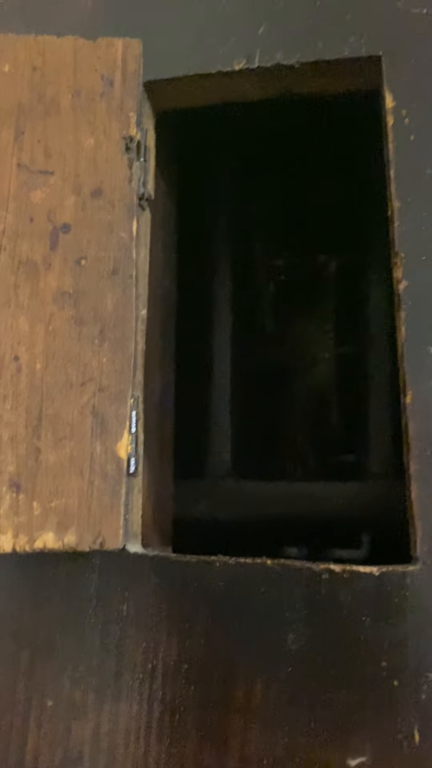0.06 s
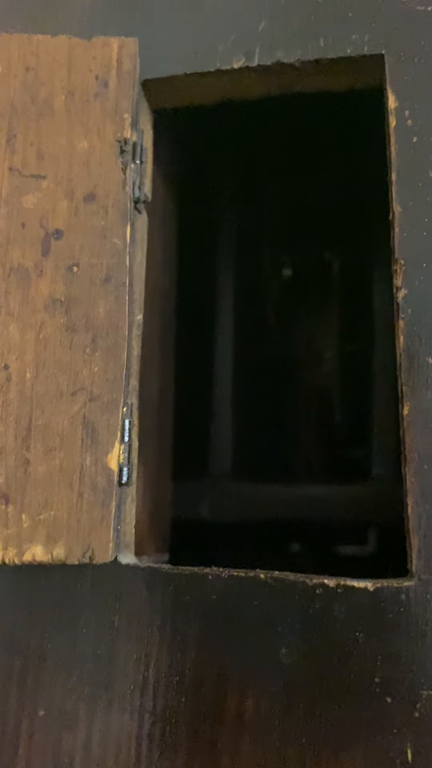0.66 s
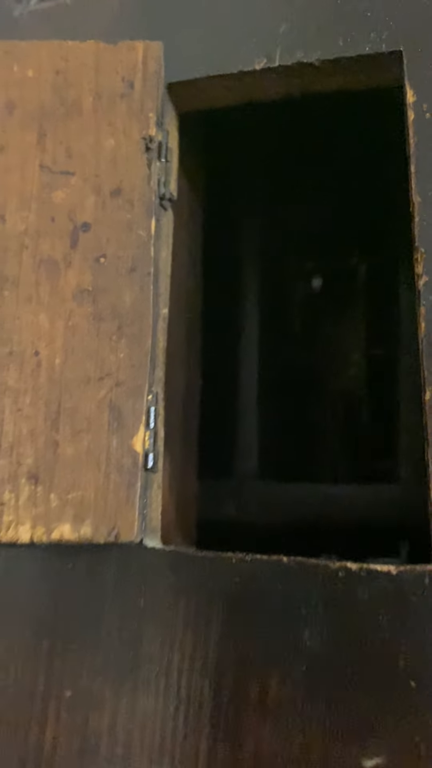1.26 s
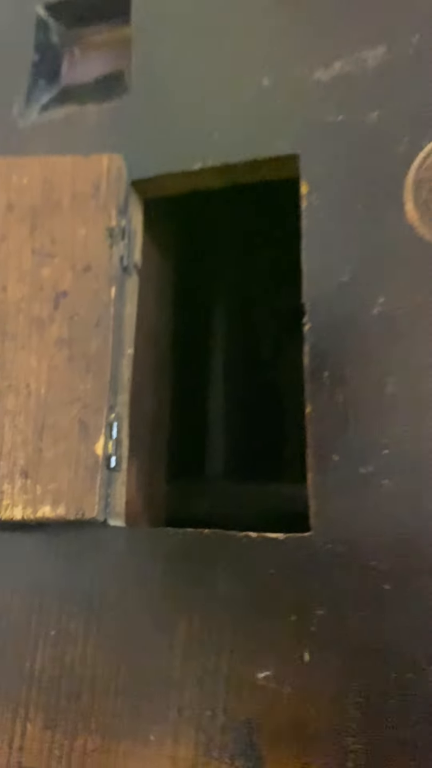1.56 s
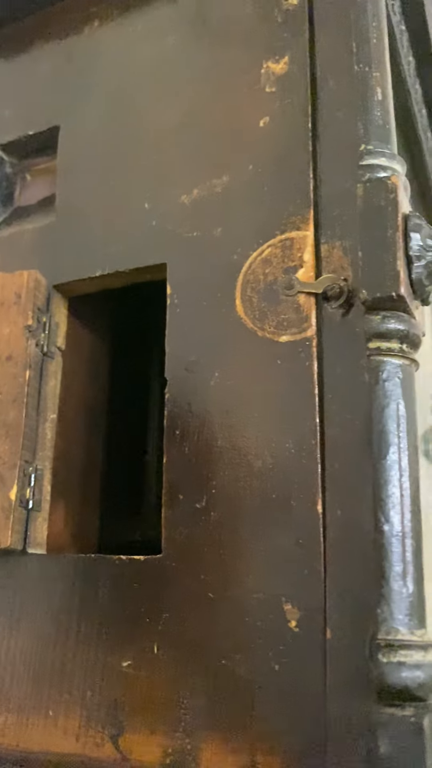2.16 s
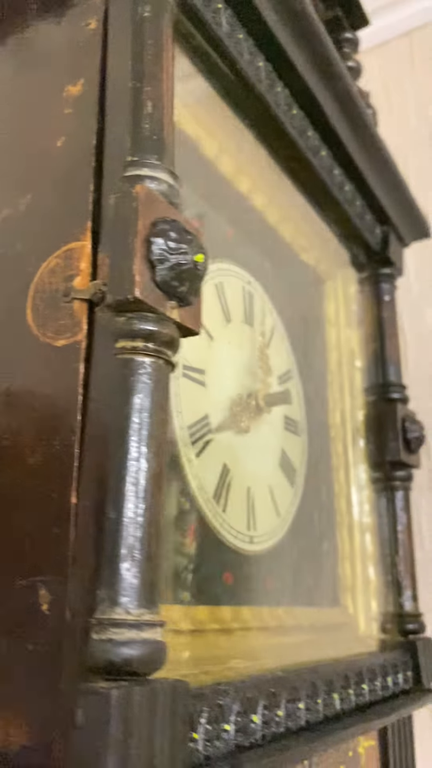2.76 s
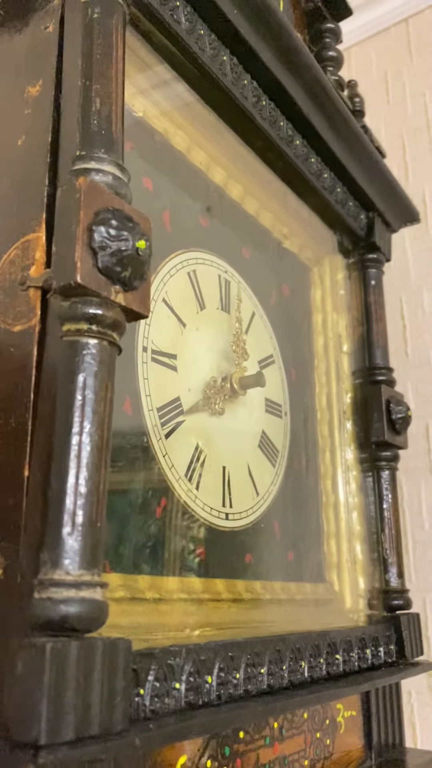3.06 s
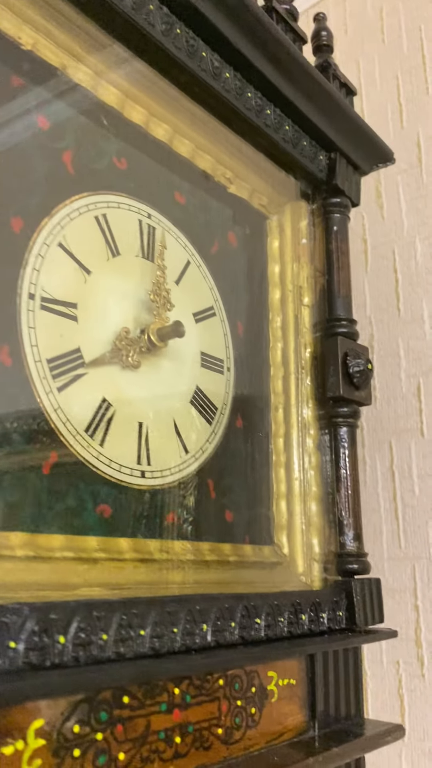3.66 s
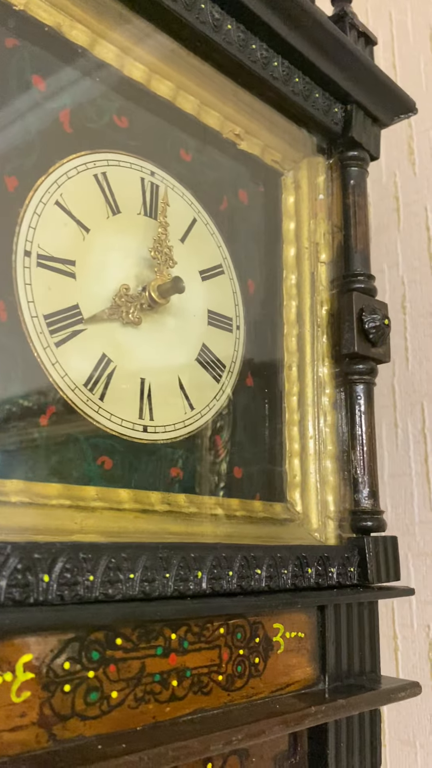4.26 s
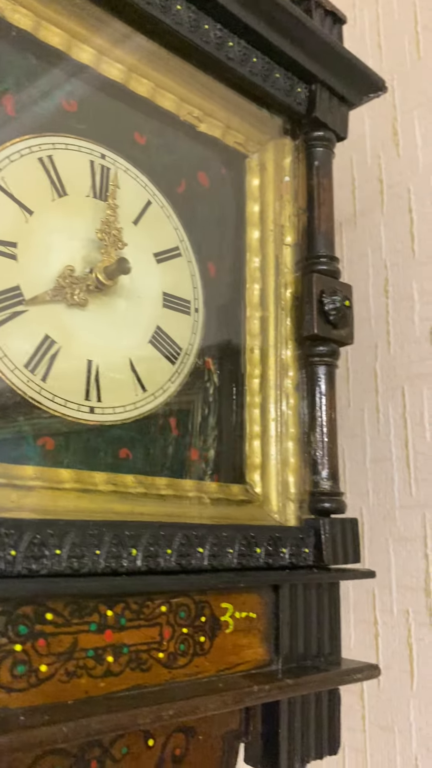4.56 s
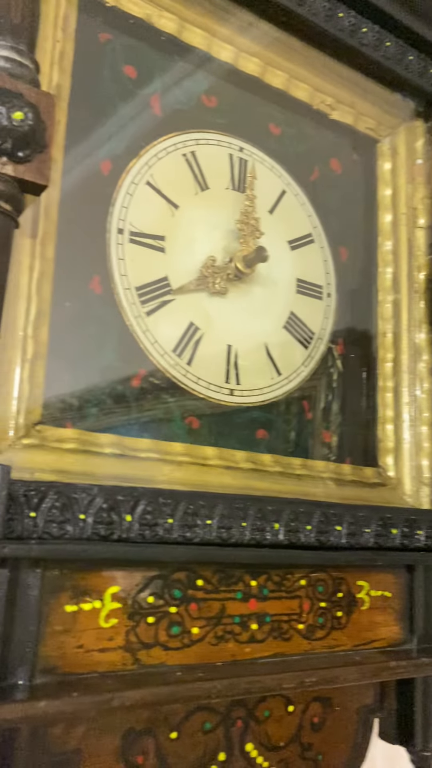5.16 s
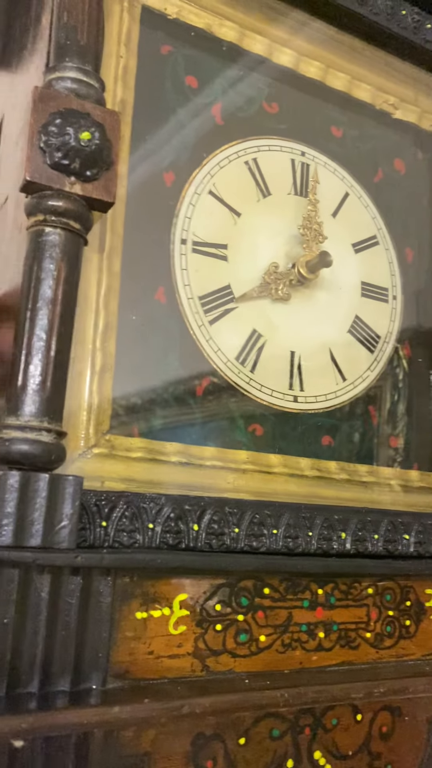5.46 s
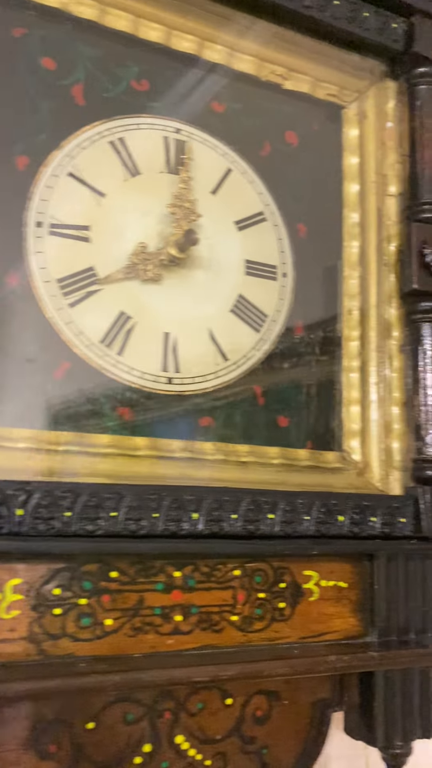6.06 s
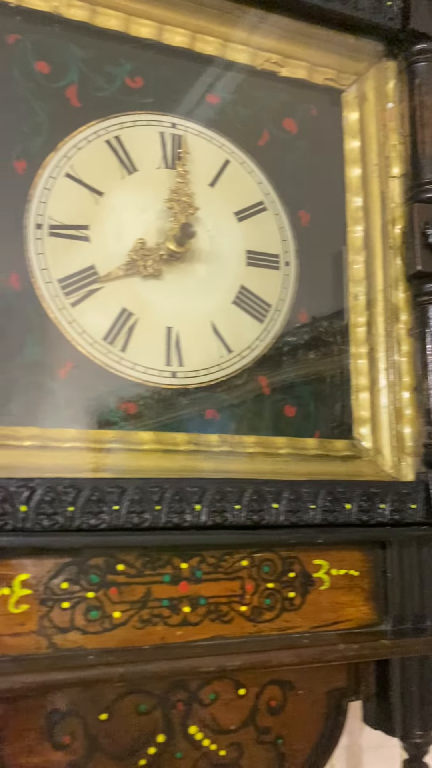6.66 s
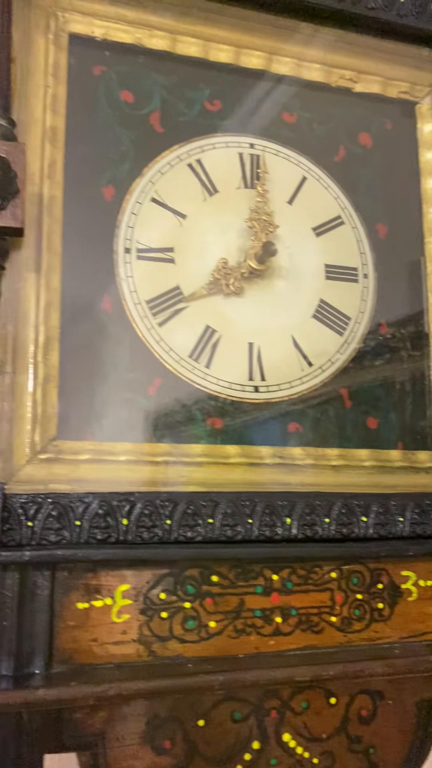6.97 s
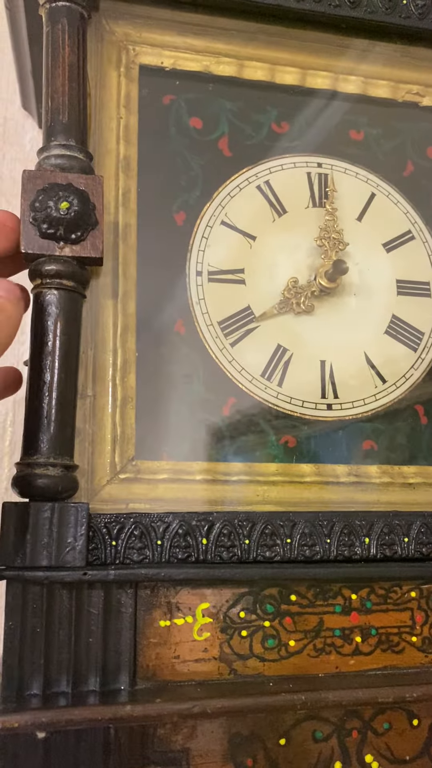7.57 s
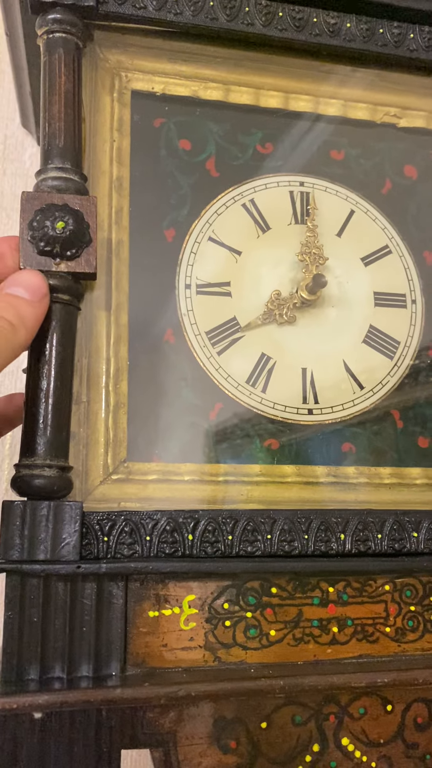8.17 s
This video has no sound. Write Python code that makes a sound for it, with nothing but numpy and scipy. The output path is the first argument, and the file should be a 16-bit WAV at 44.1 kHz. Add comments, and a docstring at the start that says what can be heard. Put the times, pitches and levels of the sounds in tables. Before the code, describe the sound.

An old wooden clock ticks close up while fingers knock and rub its case, with two other clocks ticking faintly further off.

```python
"""An old wooden cuckoo clock ticks unevenly, close up in a small room: its pallets crack on the escape
wheel, and the movement and case ring. The microphone, a hand-held phone with two ports, starts at the
open side door and moves round to the front. Fingers knock, bump and rub on the case, and brass parts
click and ring. Two more clocks tick faintly further off, over a low hum and handling rumble."""
import sys
import numpy as np
from scipy import signal
from scipy.fft import rfft, irfft, next_fast_len
from scipy.io import wavfile
from scipy.ndimage import uniform_filter1d

SR = 44100
rng = np.random.default_rng(int(sys.argv[2]) if len(sys.argv) > 2 else 0)


def unload_wav(signal):
    """Save mono or channel-first audio to the path in sys.argv[1] as 16-bit WAV at rate SR, clipped to [-1, 1]."""
    wavfile.write(
        sys.argv[1],
        SR,
        np.round(np.clip(np.atleast_2d(signal).T, -1, 1) * 32767).astype(np.int16),
    )


N = 366912
AGE = np.arange(SR // 2) / SR  # time since a blow [s]

# beats of the near clock, tick and tock in turn: (time [s], level [dB], treble [dB])
NEAR_BEATS = [(0.471, -32.5, 1), (1.002, -36.5, 8.5), (1.5881, -34.5, -1), (2.121, -34.5, 2),
              (2.702, -37.5, -6), (3.242, -42, 3.5), (3.8216, -35.5, -7.5), (4.362, -38, 2.5),
              (4.955, -42.5, -5), (5.5071, -42.5, 4.5), (6.073, -43, -4), (6.6238, -45.5, 6),
              (7.193, -44, -4), (7.735, -43.5, 3.5), (8.3022, -44, -2.5)]
# spectrum of handling rumble and thumps: (frequency [Hz], level [dB])
RUMBLE_COLOUR = [(25, -9.5), (40, -2), (60, 7), (90, 9), (150, 1), (250, -2.5), (400, -7.5), (800, -39.5)]
# spectrum of rubbing and room hiss: (frequency [Hz], level [dB])
RUSTLE_COLOUR = [(200, 2), (500, 4), (900, -0.5), (1500, -1.5), (2400, -2), (4500, -9), (7000, -17),
                 (12500, -20), (15800, -24.5)]


def undb(db):
    """Decibels to gain."""
    return 10 ** (np.asarray(db) / 20)


def at(table, hz, axis=1):
    """A column of a table read on a log-frequency axis."""
    table = np.array(table)
    return np.interp(np.log(np.maximum(hz, 1)), np.log(table[:, 0]), table[:, axis])


def gain_curve(rows):
    """Gain at every sample from (time [s], level [dB]) rows."""
    return undb(np.interp(np.arange(N) / SR, *np.transpose(rows)))


def coloured(x, points):
    """Filter by (frequency [Hz], gain [dB]) points; padding keeps the end from wrapping round."""
    size = next_fast_len(len(x) + 2048)
    gain = undb(at(points, np.fft.rfftfreq(size, 1 / SR)))
    return irfft(rfft(x, size) * gain, size)[:len(x)]


def unit(x):
    """Scale a blow to the energy of 10 ms at full level."""
    return x / np.sqrt(np.sum(x ** 2) * 100 / SR)


def add(track, s, sound):
    """Mix a sound in at time s."""
    start = int(np.clip(s * SR, 0, N - 1))
    track[start:start + len(sound)] += sound[:N - start]


def delayed(x, lag_s):
    """The same blow a little later."""
    return np.interp(AGE - lag_s, AGE, x, left=0)


def fade(rise, t60):
    """A rounded attack and an exponential decay."""
    return (1 - np.exp(-(AGE / rise) ** 2)) * np.exp(-np.log(1000) * AGE / t60)


def mode(hz, t60, rise=0.00029):
    """One damped vibration."""
    return unit(fade(rise, t60) * np.sin(2 * np.pi * (hz * AGE + rng.random())))


def chord(modes, t60, scatter_db):
    """Modes struck together, balanced anew at each blow; t60 holds at 1 kHz, higher ones die sooner."""
    return sum(undb(db + scatter_db * rng.standard_normal()) * mode(hz, t60 * (1000 / hz) ** .25, .0015)
               for hz, db in modes)


def swell(hz, swell_s):
    """A heavily damped wooden mode that builds up and dies within a few cycles."""
    return unit((AGE / swell_s) ** 4 * np.exp(-2 * AGE / swell_s) * np.sin(2 * np.pi * hz * AGE))


def burst(colour, decay):
    """Dense modes as quarter-octave noise bands; decay rows are (frequency [Hz], rise [s], t60 [s])."""
    edges_hz = 35 * 2 ** np.arange(0, 9.1, .25)
    noise = rfft(rng.standard_normal(len(AGE)))
    hz = np.fft.rfftfreq(len(AGE), 1 / SR)
    out = 0
    for lo, hi in zip(edges_hz, edges_hz[1:]):
        centre = np.sqrt(lo * hi)
        envelope = fade(at(decay, centre), at(decay, centre, axis=2))
        band = irfft(noise * (hz >= lo) * (hz < hi), len(AGE)) * envelope
        out = out + unit(band) * undb(at(colour, centre)) * np.sqrt(hi - lo)
    return unit(out)


def wash(colour, flicker_db, rate):
    """Coloured noise whose level wanders, with `rate` turns a second."""
    noise = coloured(rng.standard_normal(N), colour)
    hold = int(SR / rate)
    steps = np.repeat(rng.standard_normal(N // hold + 1), hold)[:N]
    noise = noise * undb(flicker_db * uniform_filter1d(steps, hold))
    return noise / noise.std()


def boxed(x, wall_db, count=4):
    """Reflections between the close walls of a case carve hollow peaks, different at each blow."""
    reflections = sum(delayed(x, lag / SR) for lag in rng.integers(30, 150, count))
    return unit(x + undb(wall_db) * reflections)


def room(x, colour):
    """The diffuse answer of the walls."""
    # reverberation of the small room: (frequency [Hz], rise [s], t60 [s])
    room_decay = [(100, 0.005, 0.43), (400, 0.0071, .36), (2000, 0.006, 0.36), (5900, 0.0035, 0.25),
                  (14000, 0.0095, 0.063)]
    response = burst(colour, room_decay)
    return signal.fftconvolve(x, response / np.sqrt(np.sum(response ** 2)))[:N]


def background(tone_hz=345, tone_db=-3.5, waver_hz=4, hiss_db=-79.5):
    """The hand rumbles on the phone, a low hum wavers, and the room hisses faintly."""
    # rumble of the grip, restless once the phone is at the front: (time [s], level [dB])
    grip_level = [(0, -66), (1.3, -71), (2.4, -63.5), (3.1, -65), (4.2, -60), (4.8, -58), (5.85, -58),
                  (6.5, -56.5), (6.9, -67.5), (7.3, -55.5), (7.65, -63.5), (8.32, -60)]
    # the hum, fading and returning as the phone moves: (time [s], level [dB])
    hum_level = [(0, -64), (1.1, -62.5), (1.4, -68.5), (2.8, -64.5), (3.4, -72), (4.3, -62), (5, -60.5),
                 (5.6, -71.5), (6.85, -75.5), (8.32, -65.5)]
    # noise around the hum's clear tone: (frequency [Hz], level [dB])
    hum_colour = [(150, -19.5), (240, -4), (290, -9.5), (345, 2.5), (400, -12), (480, -19.5), (700, -19),
                  (1200, -48)]
    rumble = gain_curve(grip_level) * wash(RUMBLE_COLOUR, flicker_db=4.5, rate=15)
    waver = wash([(8, 0), (30, -60)], flicker_db=0, rate=1)
    tone = np.sqrt(2) * np.sin(2 * np.pi * np.cumsum(tone_hz + waver_hz * waver) / SR)
    hum = gain_curve(hum_level) * (wash(hum_colour, flicker_db=4.0, rate=13) + undb(tone_db) * tone)
    hiss = wash(RUSTLE_COLOUR, flicker_db=1, rate=12)
    return rumble + hum + undb(hiss_db) * hiss


def far_clocks(rebound_s=.018, rebound_db=2, clink_db=5):
    """Further off, two pendulums keep their own time; each beat clinks, rebounds and blurs in the room."""
    # the slower clock, then the quicker: (first tick [s], full swing [s], tick to tock [s])
    pendulums = [(.081, 1.071, .537), (.544, .9795, .521)]
    # their voices: (tick [dB], tock [dB], body [dB], treble [dB])
    voices = [(-58, -53.5, 3, 7), (-55, -58, 2, 7)]
    # each one's clearest ring: (frequency [Hz], t60 [s], relative level [dB])
    rings = [(3085, .2, -15.5), (1138, 0.21, -17)]
    # metal modes of the clink: (frequency [Hz], level [dB])
    clink_modes = [(1135, -27.5), (2347, -23), (2616, -24), (2729, -21), (3036, -26.5), (3418, -25),
                   (4048, -27.5), (6136, -32)]
    # spectrum of the blur: (frequency [Hz], level [dB])
    blur_colour = [(600, 6.5), (1100, 0), (1700, -1.5), (2700, -2), (4500, -5.5), (7000, -17.5),
                   (13000, -22), (15800, -23)]
    tock_dull_db = (0, -7.5)  # the quicker clock's tock has less treble
    out = np.zeros(N)
    for pendulum, voice, ring, dull_db in zip(pendulums, voices, rings, tock_dull_db):
        first_s, swing_s, tock_s = pendulum
        tick_db, tock_db, body_db, treble_db = voice
        hz, t60, ring_db = ring
        for lag_s, db, top_db in ((0, tick_db, treble_db), (tock_s, tock_db, treble_db + dull_db)):
            blur = burst(blur_colour, [(498, 0.011, 0.33), (2830, 0.012, 0.26), (11970, 0.0014, 0.18)])
            tone = [(1200, body_db), (2200, 0), (4000, 0.028), (5500, top_db)]
            for s in np.arange((first_s + lag_s) % swing_s, N / SR, swing_s):
                clink = chord(clink_modes, t60=0.058, scatter_db=4.5)
                clink += undb(ring_db) * mode(hz, t60, rise=0.005)
                clink += undb(rebound_db) * delayed(chord(clink_modes, t60=0.22, scatter_db=3), rebound_s)
                beat = unit(boxed(blur, wall_db=-11.5) + undb(clink_db) * clink)
                add(out, s, undb(db) * coloured(beat, tone))
    return out


def thumps(case_db=-48, lag_s=.015):
    """Low, slow thumps: one from the hanging case just after every beat, and a few from the hand."""
    # dull bumps of the hand on the phone: (time [s], level [dB])
    hand_bumps = [(2.54, -50.5), (5.8, -49), (6.33, -47), (6.71, -54), (7.28, -52.5), (8.15, -41)]
    case_thumps = [(beat[0] + lag_s, case_db) for beat in NEAR_BEATS]
    out = np.zeros(N)
    for s, db in case_thumps + list(hand_bumps):
        push = rng.standard_normal(len(AGE)) * fade(rise=.012, t60=0.42)
        add(out, s, undb(db) * unit(coloured(push, RUMBLE_COLOUR)))
    return out


def rubbing(attack_s=0.034, release_s=0.04):
    """Each stroke swells, holds and dies away: a grainy rub with a thin airy slide above it."""
    # strokes of the hand over the wood: (start [s], length [s], rub [dB], slide [dB])
    strokes = [(0.402, 0.443, -91.5, -74), (0.822, 0.091, -70.5, -70), (1.696, .38, -69, -71),
               (2.076, 0.34, -72.5, -82), (3.717, 0.37, -68, -84), (4.164, 0.73, -70, -103),
               (4.88, 0.15, -67, -91), (5.22, 0.29, -67, -83.5), (6.331, .13, -67.5, -68),
               (6.635, 0.05, -62, -91), (7.957, 0.26, -74.5, -88)]
    t = np.arange(N) / SR
    rub_gain, slide_gain = np.zeros((2, N))
    for s, length_s, rub_db, slide_db in strokes:
        press = np.clip((t - s) / attack_s, 0, 1) * np.clip(1 - (t - s - length_s) / release_s, 0, 1)
        rub_gain += undb(rub_db) * press
        slide_gain += undb(slide_db) * press
    slide_colour = [(4000, -7), (8000, -10.5), (11000, -1.5), (13000, -4.0), (15800, -14.0)]
    slide = wash(slide_colour, flicker_db=1.5, rate=71)
    rub = wash(RUSTLE_COLOUR, flicker_db=2.5, rate=110)
    return rub_gain * rub + slide_gain * slide


def surroundings():
    """All that is faint or far from the microphone."""
    return far_clocks() + rubbing() + thumps() + background()


def clicks_and_rings(split_hz=23):
    """Small dry clicks, and metallic rings in which two close modes beat."""
    # clicks of loose parts: (time [s], relative level [dB], treble [dB])
    clicks = [(4.334, -64, 18), (5.445, -40, 21), (5.97, -43.5, 1), (5.994, -40, 9.5), (6.847, -67, -2),
              (7.02, -51.5, 4), (7.507, -46.5, 21), (8.083, -46, 10.5)]
    # spectrum of a click: (frequency [Hz], level [dB])
    click_colour = [(500, 14), (1200, 10.5), (2500, 10), (5000, 8.5), (8000, -10), (12000, -6),
                    (15800, -18)]
    # metallic rings; the brief one at 1.074 s is the quicker far clock's tock:
    # (time [s], frequency [Hz], t60 [s], level [dB])
    metal_rings = [(.475, 4980, .8, -63), (1.005, 2140, .5, -57), (1.074, 2790, .09, -60),
                   (2.705, 4980, .8, -68), (3.244, 1921, .09, -37.5), (3.244, 2160, .6, -54),
                   (7.194, 2162, .6, -60)]
    out = np.zeros(N)
    for s, db, treble_db in clicks:
        click = burst(click_colour, [(500, 0.002, 0.25), (8000, 0.002, 0.016)])
        add(out, s, undb(db - 7.5) * coloured(click, [(5000, 0.024), (9000, treble_db)]))
    for s, hz, t60, db in metal_rings:
        add(out, s, undb(db) * unit(mode(hz, t60) + 0.29 * mode(hz + split_hz, t60)))
    return out


def knocks(neutral_db=-32, brightening=2.95, panel_lag_s=0.000963):
    """A contact click, then the panel answers; hard knocks are higher and shake the case, soft ones thud."""
    # fingers on the case: (time [s], level [dB], panel pitch [Hz], relative click level [dB])
    finger_knocks = [(3.2421, -23.5, 357, -15), (3.5486, -25, 358.2, -17), (4.493, -31, 338, -22),
                     (4.612, -43.5, 313, -18.5), (4.744, -36.5, 301, -15), (4.756, -40, 325, -33),
                     (4.776, -36.5, 322.5, -23), (4.827, -29.5, 318.5, -12.5), (4.8525, -28.5, 329, -11.5),
                     (4.983, -30.5, 324, -12), (5.0009, -35, 325, -20), (5.0215, -36.5, 305, -19),
                     (5.047, -34.5, 316, -23), (5.438, -28.5, 312, -12), (5.4458, -34.5, 312, -7.5)]
    # panel modes: (ratio to the pitch, swell time [s], level when soft [dB], level when hard [dB])
    panel_modes = [(.5, 0.0029, -6.5, -20), (.75, 0.0034, -60, 3), (1, 0.0033, 3.5, 2),
                   (1.45, .0028, -36, -2.5), (1.852, 0.0035, -12.5, -13)]
    # what a knock shakes in the rest of the case: (frequency [Hz], level [dB])
    shake_colour = [(200, -38), (380, 27.5), (550, -8.5), (800, 10), (1200, 7), (2500, -33), (8000, -20)]
    # click of finger on wood: (frequency [Hz], level [dB])
    contact_colour = [(500, 9), (700, 1), (1200, 8), (2000, 4.5), (3000, -9), (5000, -22), (8000, -35),
                      (12000, -50.5), (15800, -63)]
    out = np.zeros(N)
    for s, db, pitch_hz, click_db in finger_knocks:
        hardness = np.clip((pitch_hz - 315) / 50, 0, 1)
        panel = unit(sum(undb(soft_db + hardness * (hard_db - soft_db)) * swell(ratio * pitch_hz, swell_s)
                         for ratio, swell_s, soft_db, hard_db in panel_modes))
        shake = burst(shake_colour, [(334, 0.002, 0.35), (1200, 0.0013, 0.1)])
        wood = panel + undb(-21.5 + 12.1 * hardness) * shake
        add(out, s + panel_lag_s, undb(db) * coloured(wood, [(40, -17), (130, -1.0)]))
        click = burst(contact_colour, [(500, 0.00053, 0.069), (5000, 0.0013, 0.03)])
        treble_db = brightening * (db - neutral_db)  # a stronger knock has a brighter click
        add(out, s, undb(db + click_db) * coloured(click, [(2500, 0), (6000, treble_db)]))
    return out


def escapement(rebound_s=.015, rebound_db=-8, case_db=-8, loose_db=-10, ring_db=3):
    """Close up, each pallet cracks on the wheel and rebounds; the movement and the case ring."""
    # each pallet landing on the escape wheel: (frequency [Hz], level [dB])
    tick_colour = [(45, -4.5), (90, 3), (200, -9.5), (350, -2), (480, -10.5), (750, -18), (1000, -17.5),
                   (1400, -12.5), (2100, -3.5), (3200, -12), (5000, -7), (7500, -16.5), (13000, -10),
                   (15800, -22)]
    tock_colour = [(45, 2.5), (90, -3.5), (200, 8.5), (350, 2), (480, 3), (750, -4.5), (1000, -5),
                   (1400, -0.5), (2100, 3.5), (3200, -5), (5000, -8), (7500, -15.5), (13000, -9),
                   (15800, -20.5)]
    # modes of the movement that each pallet favours: (frequency [Hz], level [dB])
    tick_modes = [(549, -23), (635, -21), (1033, -20), (1125, -20), (1792, -19), (1932, -14), (2160, -17),
                  (2567, -19), (2826, -19), (3213, -21), (3310, -20), (4462, -14), (5259, -23), (6917, -22),
                  (9356, -21), (11159, -22)]
    tock_modes = [(958, -17), (1087, -16), (1216, -16), (1469, -20), (1749, -20), (1932, -18), (2160, -9),
                  (2573, -19), (3413, -17), (4236, -28), (4635, -19), (5760, -22), (6621, -24), (7644, -26),
                  (9038, -24), (11062, -20)]
    # how the case takes up a beat: (frequency [Hz], rise [s], t60 [s])
    case_decay = [(91.5, 0.012, 0.02), (345, 0.0057, 0.31), (1000, 0.012, 0.18), (4000, 0.009, 0.3),
                  (13000, 0.0015, 0.14)]
    # from the open side door round to the glass front, the crack weakens and the wood takes over:
    # (time [s], wooden body [dB], relative crack level [dB])
    microphone_path = [(0.5, 6, 12.5), (1.1, 5, 17), (2.399, -0.5, 12.5), (4.3, 3, 12.5), (6.1, 7, 9),
                       (8.3, 8, 9)]
    crack_decay = [(1000, 0.012, 0.033), (4240, 0.00065, 0.034), (11000, 0.0039, .018)]
    pallets = []
    for colour, modes in ((tick_colour, tick_modes), (tock_colour, tock_modes)):
        crack = coloured(burst(colour, crack_decay), [(200, -25.5), (900, -14.5)])
        pallets.append((colour, modes, crack, burst(colour, case_decay)))
    times, *balance = np.transpose(microphone_path)
    out = np.zeros(N)
    for k, (s, db, treble_db) in enumerate(NEAR_BEATS):
        colour, modes, crack, case = pallets[k % 2]
        body_db, crack_db = (np.interp(s, times, column) for column in balance)
        # the wheel rebounds twice, which thickens the click into a clack
        rebounds = undb(rebound_db) * delayed(crack, rebound_s)
        rebounds += undb(rebound_db - 2.5) * delayed(crack, 1.5 * rebound_s)
        strike = undb(crack_db - 7.5) * boxed(crack + rebounds, wall_db=-7.5)
        # no two teeth land quite alike
        ring = chord(modes, t60=.14, scatter_db=2)
        loose = burst(colour, case_decay)
        body = undb(case_db) * case + undb(loose_db) * loose + undb(ring_db) * ring
        tone = [(1200, body_db), (1600, 0.5), (2100, 0.0), (3000, -1), (5000, treble_db)]
        add(out, s, undb(db) * coloured(unit(strike + body), tone))
    return out


def scene():
    """Close beats, knocks and clicks sit in the centre; the echo and the faint sounds spread wide."""
    beats, blows, parts = escapement(), knocks(), clicks_and_rings()
    direct = beats + blows + parts + surroundings()
    to_walls = undb(-14.0) * beats + undb(-10.0) * (blows + parts)
    mid = direct + room(to_walls, [(100, 12.0), (380, 0.92), (800, 3.3), (5000, 3.6), (14000, 1.5)])
    diffuse = room(to_walls, [(200, 5.3), (14000, 11.5)]) + surroundings()
    width = [(60, -18.5), (300, -10), (800, 0), (4000, -3.5), (6500, -24.5), (9000, -50.5)]
    side = coloured(diffuse, width)
    return np.array([mid + side, mid - side])


def record(dry, low_cut_hz=42, top_hz=15800):
    """The phone's ports shift phase and balance with frequency; the deepest bass and the top are cut."""
    # the two microphone ports: (frequency [Hz], phase lead of left [rad], left minus right [dB])
    ports = [(0, 0, -.4), (350, 0, .6), (700, -.15, 3.5), (1150, -.4, 1.2), (2000, .25, -1), (3400, .9, .6),
             (4300, .9, -2.5), (5100, .1, 1.5), (7400, 3.14, 0), (10200, 6.28, 0), (13400, 9.42, 0),
             (16000, 12, 0)]
    hz = np.fft.rfftfreq(N, 1 / SR)
    port_hz, *columns = np.transpose(ports)
    lead, balance_db = (np.interp(hz, port_hz, column) for column in columns)
    left = undb(balance_db / 2) * np.exp(.5j * lead)
    heard = irfft(rfft(dry) * np.array([left, 1 / left]), N)
    heard = signal.sosfilt(signal.butter(3, low_cut_hz, "high", fs=SR, output="sos"), heard)
    return signal.sosfilt(signal.ellip(10, .2, 80, top_hz, fs=SR, output="sos"), heard)


dry = scene()
out = record(dry)
unload_wav(out)
```